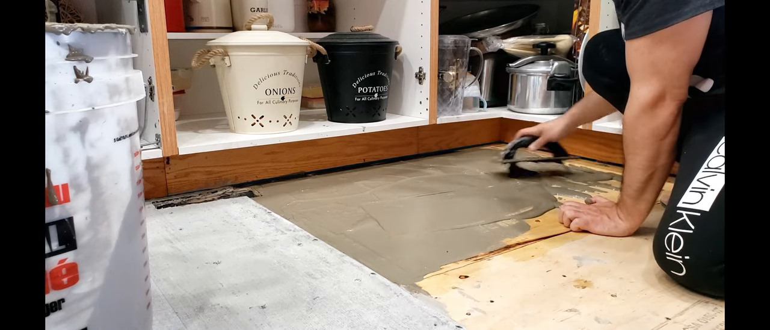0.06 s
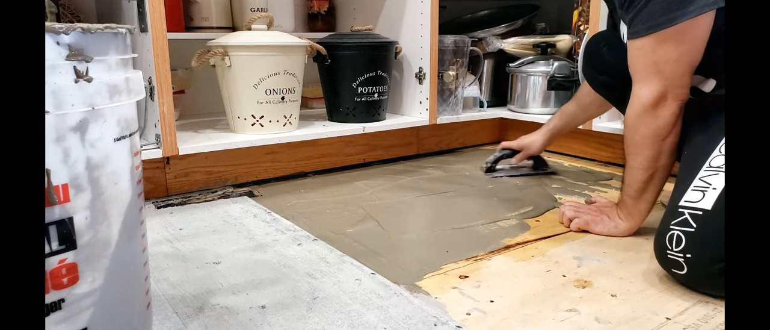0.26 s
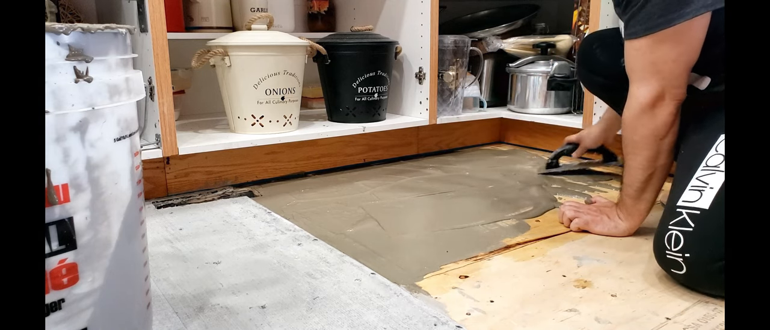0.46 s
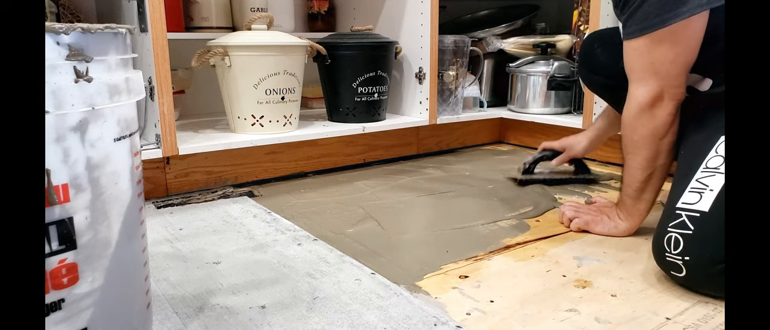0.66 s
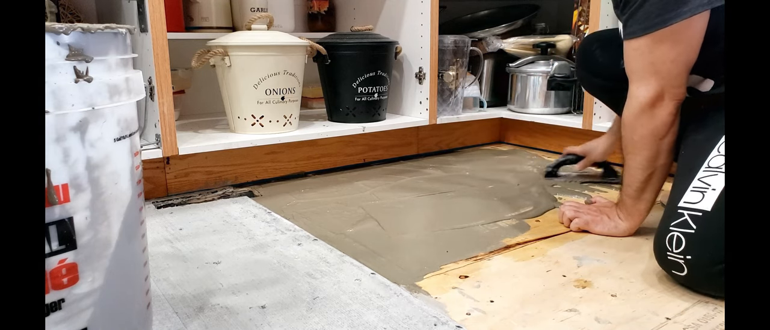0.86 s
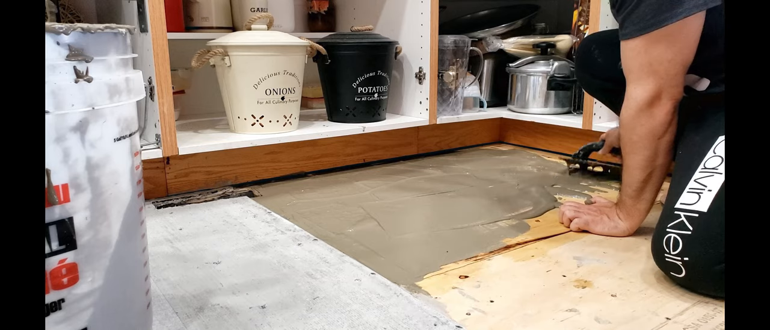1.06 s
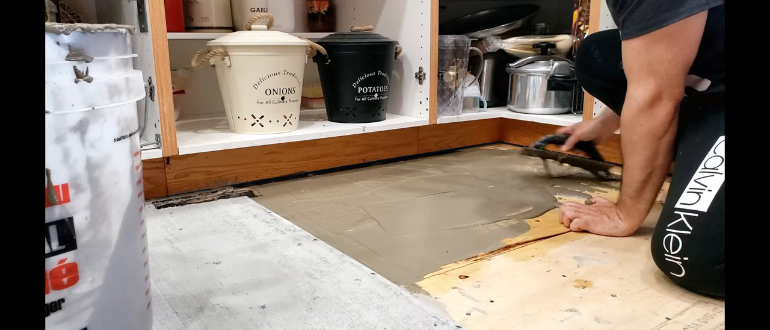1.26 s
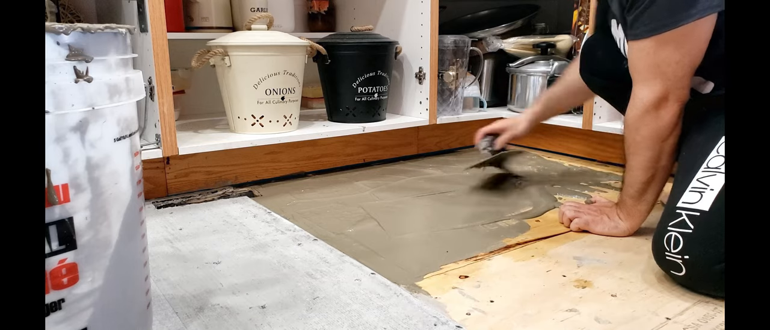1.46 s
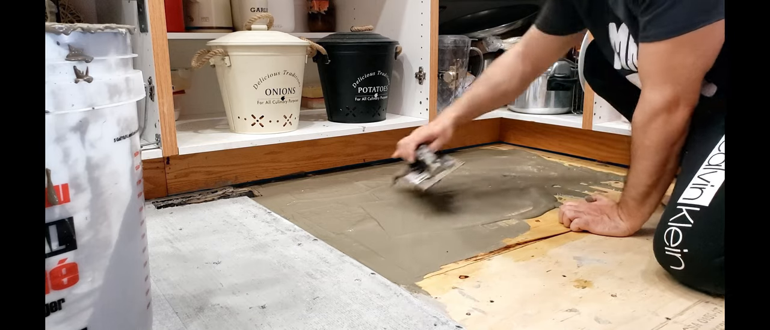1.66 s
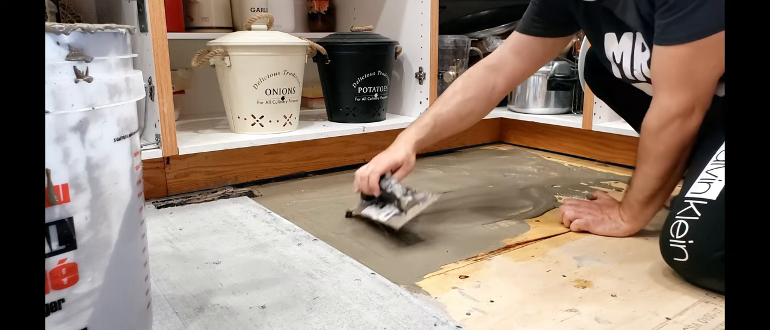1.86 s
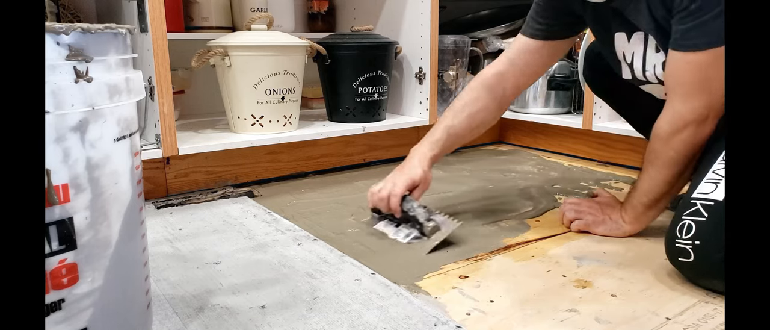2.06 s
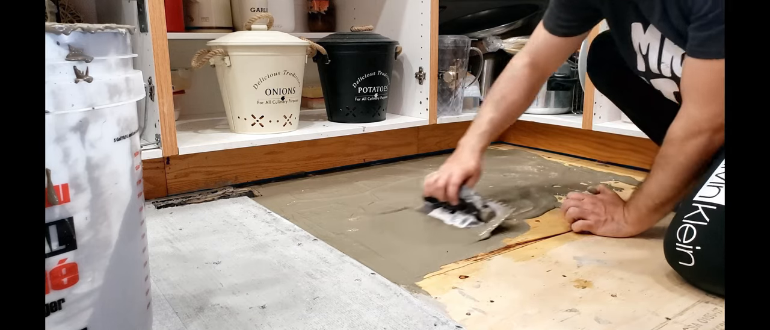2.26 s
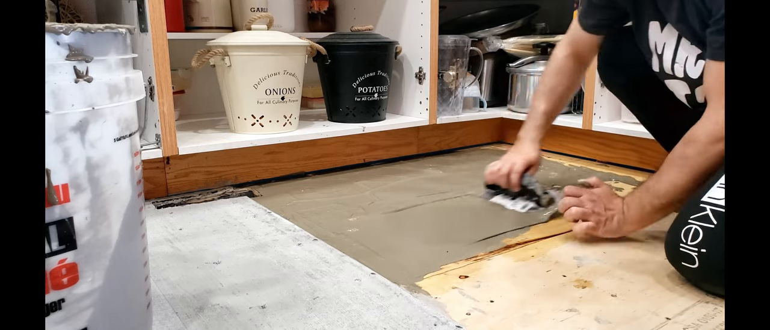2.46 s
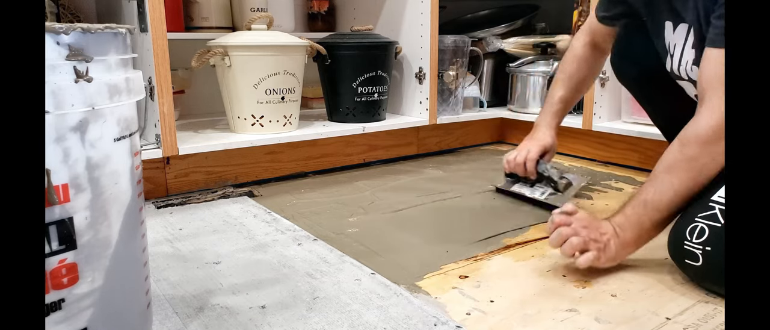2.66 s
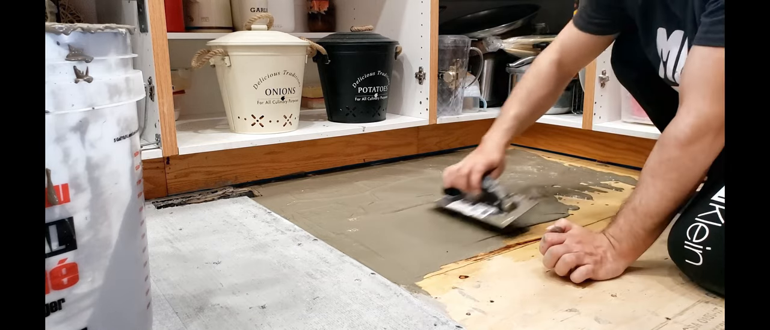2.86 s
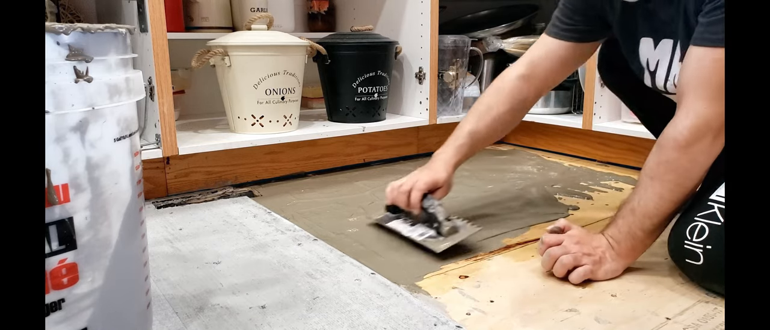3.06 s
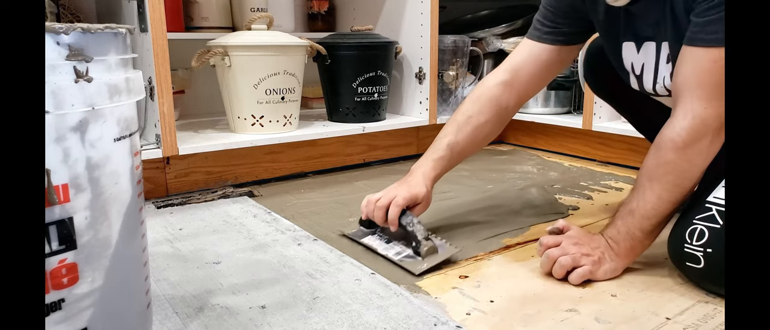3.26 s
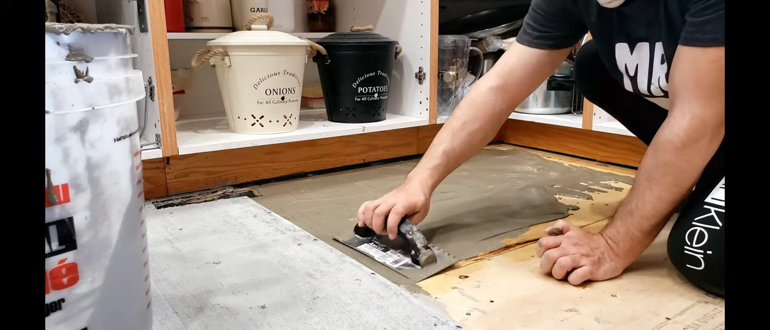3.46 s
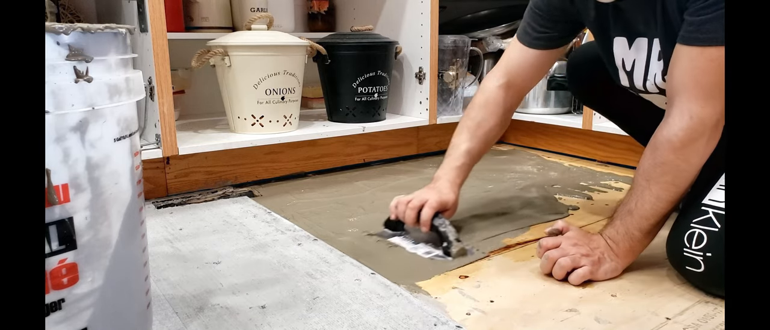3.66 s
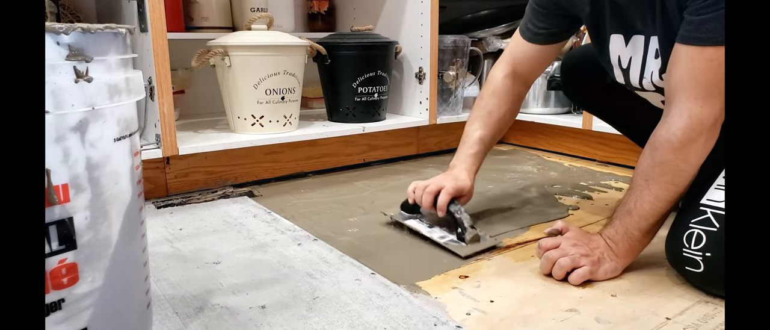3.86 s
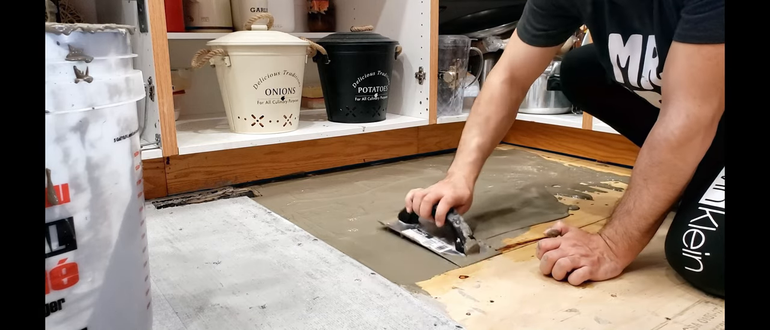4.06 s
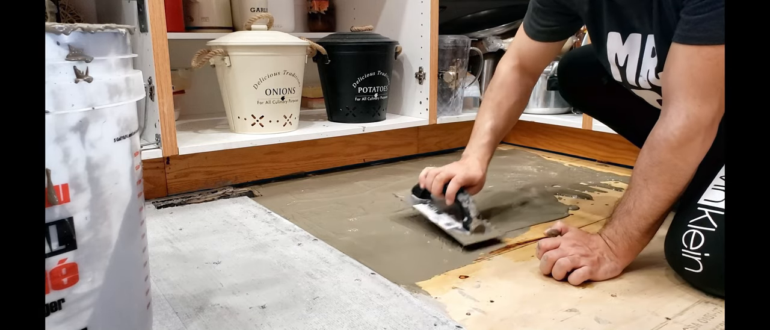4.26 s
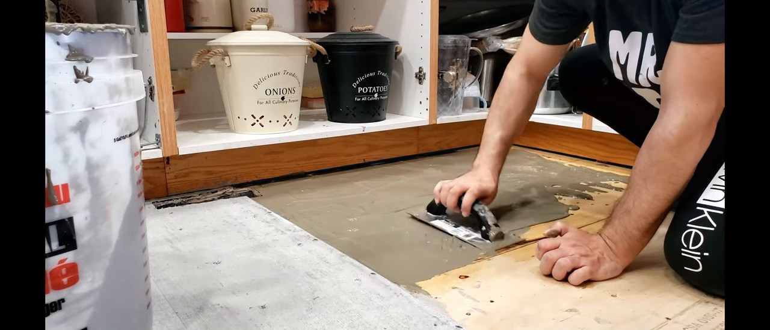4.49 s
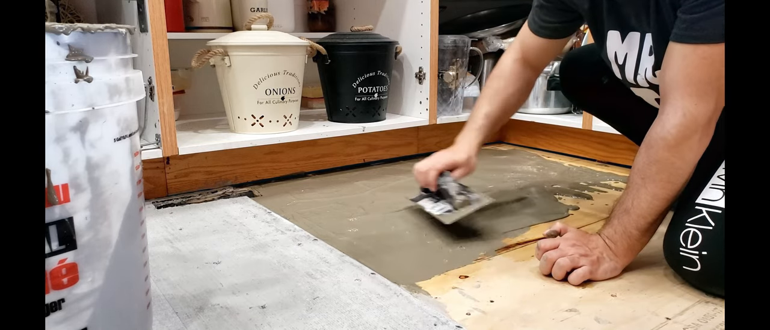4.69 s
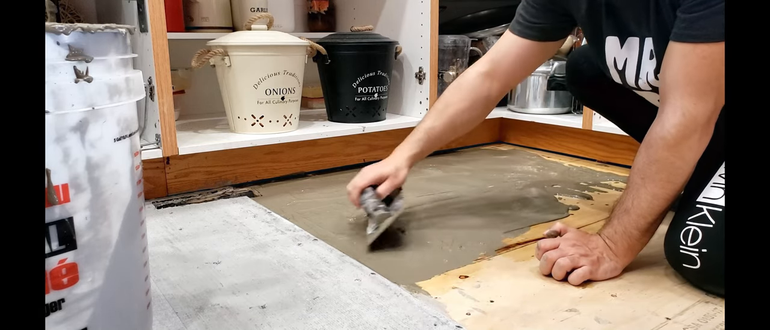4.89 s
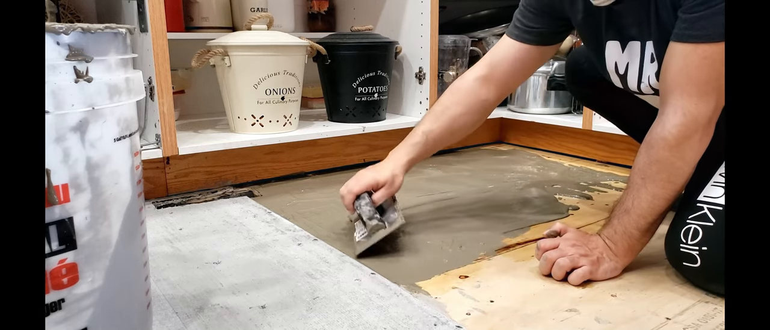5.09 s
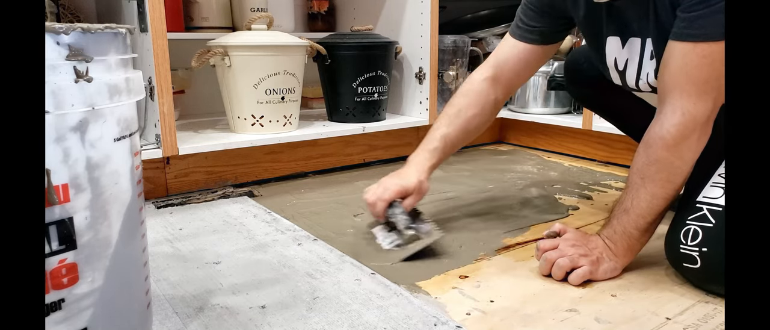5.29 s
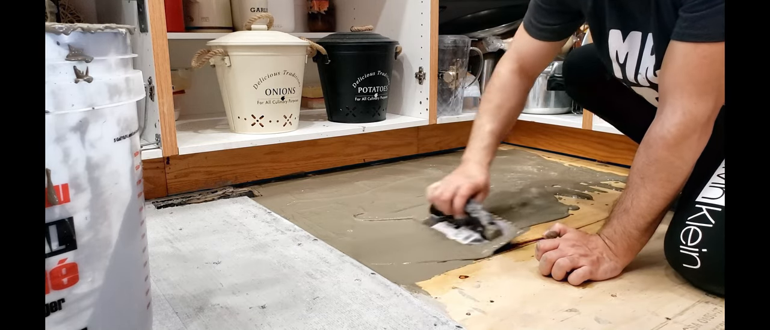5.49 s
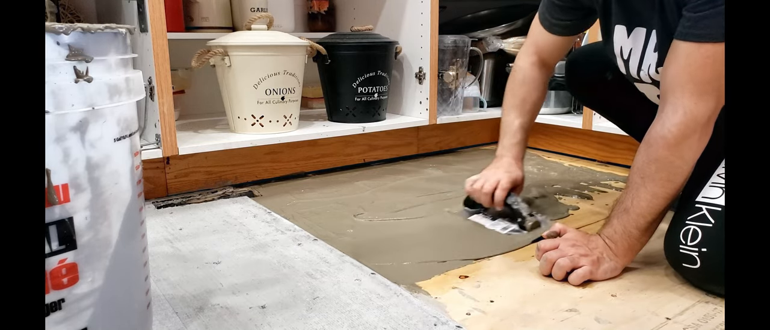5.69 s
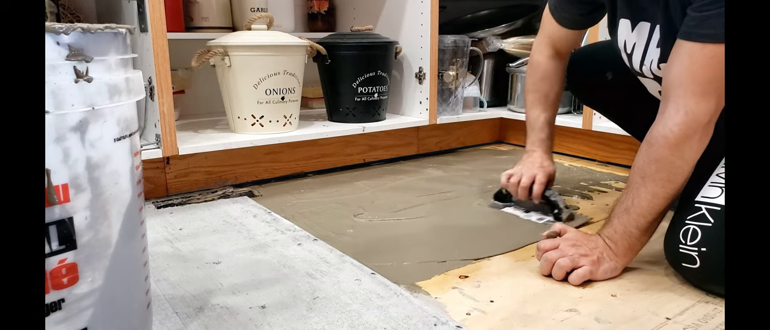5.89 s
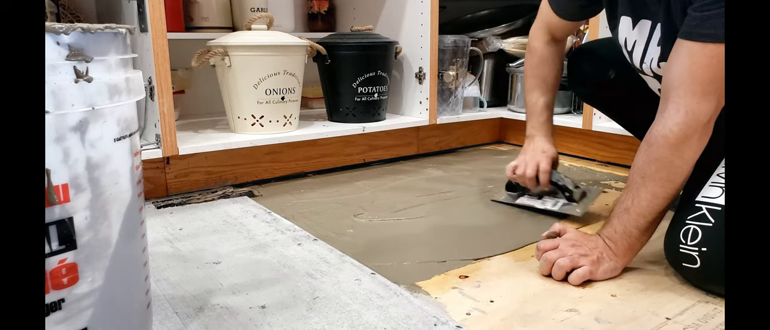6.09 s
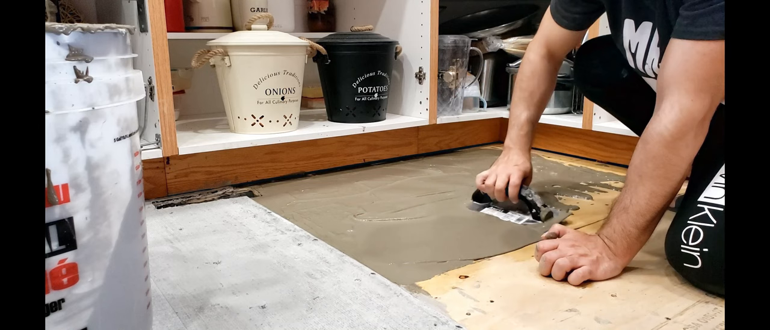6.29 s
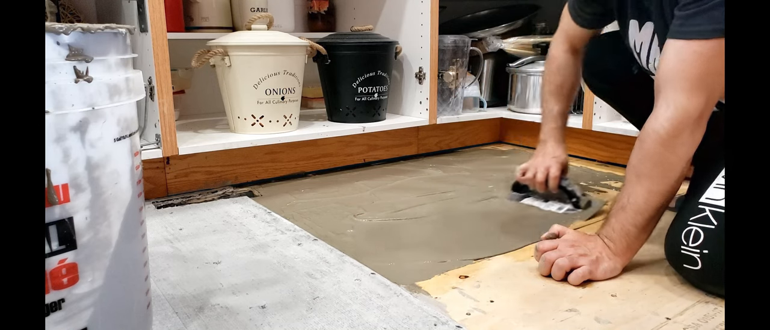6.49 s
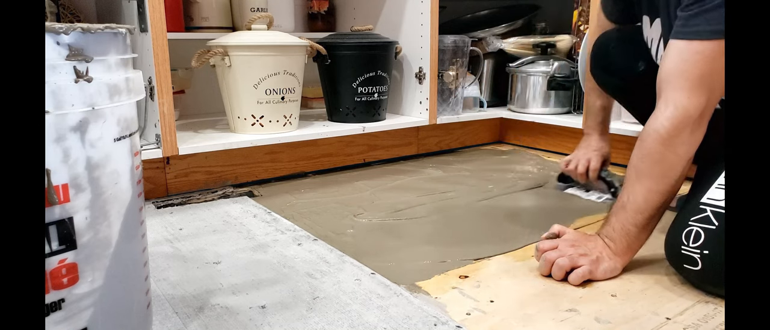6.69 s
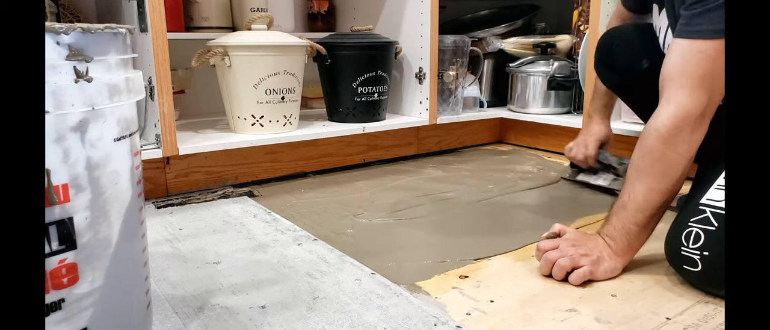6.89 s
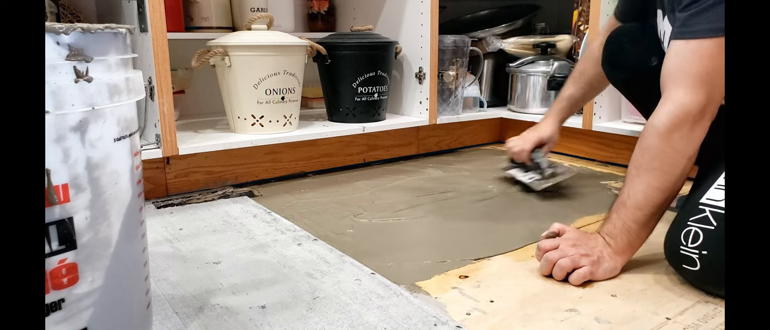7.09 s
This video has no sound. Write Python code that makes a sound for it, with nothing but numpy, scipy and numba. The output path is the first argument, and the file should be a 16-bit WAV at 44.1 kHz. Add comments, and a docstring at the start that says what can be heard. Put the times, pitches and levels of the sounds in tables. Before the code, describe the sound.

A steel trowel works thick mortar over a wooden subfloor, close by in a small room with a short echo. An appliance hums and hisses softly throughout. Each stroke is a sandy crackle with a blade rasp and a low shudder of boards.

A light tap at 0.4 seconds leads to a short scrape, then a wooden knock at 0.9 and another scrape. After a lull, the blade thumps down around 2.1 and drags until 2.7. A soft bump comes at 3.3, and scraping resumes from 3.5 to 4. The heaviest thumps fall at 4.2 and 4.6, each with a quick stroke. Between 3.9 and 4.7 the edge flicks over grit with thin steel rings, the last one brightest. Two dull bumps follow around 5. From 5.3 to 7 the strokes run almost together, with a faint ring at 6.1 and a knock at 6.4.

```python
"""A steel trowel spreads thick mortar over a wooden subfloor in a small room, in short strokes.
Each time the blade lands, the floor thumps. As it drags, sand crackles under the edge, the blade
rasps, and its sticking and slipping shakes the boards. Now and then the edge flicks over grit and
the steel rings. An appliance hums and hisses softly behind it all."""
import sys
import numpy as np
from scipy import signal
from scipy.fft import rfft, irfft, next_fast_len
from scipy.io import wavfile
from scipy.ndimage import uniform_filter1d
from numba import njit

SR = 44100
rng = np.random.default_rng(int(sys.argv[2]) if len(sys.argv) > 2 else 0)


def write(x):
    x = np.atleast_2d(x).T
    wavfile.write(sys.argv[1], SR, np.round(np.clip(x, -1, 1) * 32767).astype(np.int16))


N = 315046
TIME = np.arange(N) / SR
TOP_HZ = 16000

# The appliance's hum. Each row: pitch in Hz, level in dB.
HUM_TONES = [(59.2, -53), (118.4, -66.5), (355.3, -77.5), (500.6, -81)]
# The appliance's hiss and the room's rumble. Each row: frequency in Hz, relative level in dB.
AIR_COLOUR = [(25, -5), (58, -2), (100, -0.5), (160, -6.5), (220, -16), (400, -15), (700, -26.5),
              (950, -19), (1400, -31), (2100, -14), (3200, -40), (4400, -33.5), (5800, -31.5), (6200, -26),
              (6700, -31), (8500, -42), (15000, -35)]
# The blade lands or the floor is leant on. Each row: time in seconds, then the strength in dB of
# the floor's thump, the boards' knock, the blade's clack and the sand's tick.
LANDING_HITS = [(0.371, -45, -54, -55.5, -59), (0.418, -57, -75, -63, -75), (0.909, -36.5, -32, -46, -58),
                (2.117, -39.5, -55, -54.5, -61), (2.156, -29, -39, -47, -49.5),
                (3.251, -38.5, -70, -84, -93), (3.303, -47, -75, -80, -96), (3.539, -58, -54, -71, -58.5),
                (4.222, -23.5, -44.5, -43, -43), (4.599, -23, -47, -39.5, -51),
                (5.014, -28.5, -66, -66, -75), (5.133, -29, -54, -60, -65.5),
                (5.322, -38.5, -52, -61, -57.5), (6.44, -34, -41.5, -43.5, -58)]
# Ringing notes. Each row: pitch in Hz, seconds to fade by 60 dB, relative level in dB.
JOIST_NOTES = [(61.2, 0.27, 5.5), (78, 0.16, 8), (90.7, 0.42, 1), (129, 0.11, 2), (151.6, 0.3, 4),
               (183, 0.31, -2.5), (195.5, 0.12, -2.5)]  # the floor bouncing on the beams under it
BOARD_NOTES = [(144, 0.08, 8), (194.5, 0.41, 5), (230, 0.22, 5), (305.9, 0.25, 7), (347, 0.28, -18),
               (403.3, 0.47, -4.5), (457, 0.57, -6), (568, 0.56, -9.5), (632, 0.21, -16), (724, 0.26, -6.5)]  # the floorboards
DAMPED_BLADE_NOTES = [(922, 0.31, 16), (1340, 0.032, -43), (1400, 0.083, 9), (1670, 0.53, -2.5),
                      (1610, 0.038, -9), (1900, 0.03, 39.5), (2040, .08, -31), (2150, 0.24, -28),
                      (2410, 0.054, 2), (2650, 0.063, -35.5)]  # the blade in mortar
FREE_BLADE_NOTES = [(1940, 0.34, -4), (3970, 0.67, -13), (4300, 0.38, -29), (4274, .25, -3),
                    (5330, 0.25, -7), (6400, 0.18, 3)]  # the blade ringing freely
# The broad tone of boards, blade and sand. Each row: frequency in Hz, relative level in dB.
BOARD_TONE = [(50, -10.5), (100, -14), (180, 2), (320, 2.5), (650, 7), (850, -3.5), (1300, -4.5),
              (3000, -47)]
BLADE_TONE = [(300, -26.5), (600, -19.5), (850, 2.5), (1100, -7), (1500, -0.5), (2400, -4.5), (3200, -14.5),
              (5000, -12), (10000, -66.5)]
SAND_TONE = [(800, -46), (2000, -1), (3200, 0.5), (4300, 4), (5300, 2), (6200, 2), (7000, 1), (8000, -7),
             (9500, -7), (12500, -2), (16000, -10.5)]
# The trowel's pushes. Each row: start, length and fade-in in seconds, drive on the sand in dB, its
# swell over the push in dB, extra drive on the blade and on the boards in dB, mortar heaped up from
# 0 to 1, pitch of the chatter and of the blade's flexing in Hz, starting place in metres.
PUSHES = [ (0.514, 0.1, 0.024, -38.5, 5.5, 2.5, 0, 0.82, 273, 1340, 0.59),
          (0.92, 0.18, 0.011, -76, 12, -7, 19, 0, 417, 1410, .8),
          (1.051, 0.077, 0.028, -39, 1, -2.5, 3, 0.64, 377, 1700, 0.89),
          (2.157, 0.13, 0.0035, -48.5, -7.5, 6, 8, 0.1, 194, 1440, 0.033),
          (2.313, 0.21, 0.04, -42.5, 8, 5, 6, 0, 560, 1010, 0.14),
          (2.535, 0.18, 0.063, -40, -6.5, 4, 7.5, 0.7, 400, 1220, 0.44),
          (3.538, 0.12, 0.0023, -57.5, -7, 0, -2, 0, 168, 1510, 0.036),
          (3.625, 0.21, 0.13, -42, 2, -4, -2.5, 0.02, 284, 1450, 0.066),
          (3.859, 0.087, 0.061, -34, -10, -9.5, -8, 0.53, 245, 1590, 0.34),
          (4.222, 0.13, 0.0031, -40, 9, 1.5, -2.5, 0.23, 191, 1680, 0.12),
          (4.601, 0.089, 0.013, -37.5, -1, 1, -2, 0.1, 187, 1840, 0.32),
          (4.996, .035, 0.009, -60, -4.5, 12, 11.5, 0, 149, 1400, 0.11),
          (5.136, 0.041, 0.012, -55, -11, 13, 13.5, 0.35, 146, 1180, 0.12),
          (5.314, 0.23, 0.089, -43, 5, 6, 3, 0.24, 192, 1470, 0.058),
          (5.597, .24, 0.041, -42, -9, 2.5, 5, 0, 380, 1540, .3),
          (5.842, 0.266, 0.034, -41.5, -1.5, -4, 0, 0, 278, 1830, 0.437),
          (6.106, 0.071, 0.058, -44.5, -5, 12, 1, 1, 404, 1490, 0.73),
          (6.288, 0.024, .012, -57, 7, 0, 3, 0, 192, 1400, 0.48),
          (6.452, 0.25, 0.16, -35, 1.5, 3, -1, 0.47, 490, 1660, 0.67),
          (6.727, 0.21, 0.011, -35.5, 4.5, -1.5, 1.5, 1, 270, 1340, 0.73), ]
# The edge flicks over grit. Each row: time in seconds, strength of the scrape and of the ring in dB.
GRIT_FLICKS = [(3.923, -38, -58), (4.308, -40, -62), (4.379, -35.5, -52), (4.714, -29.5, -42),
               (6.075, -39, -60)]
# How long the room rings. Each row: frequency in Hz, seconds to fade by 60 dB.
ROOM_DECAY = [(100, 0.83), (400, 0.26), (1800, 0.35), (5000, 0.31), (13000, 0.25)]
# Sound that arrives by the walls. Each row: frequency in Hz, level in dB against the direct sound.
ECHO_LEVEL = [(60, -18.5), (250, -15), (600, 5), (1300, 1), (5000, 4), (14000, 6)]
# The trowel's stereo balance. Each row: frequency in Hz, left minus right in dB.
LEFT_MINUS_RIGHT = [(100, 3), (250, -0.2), (1200, 4.5), (2400, 2.4), (5500, 1.2), (8000, -2), (11000, -3.5),
                    (15000, -6)]


def amp(db):
    """Turn decibels into a gain."""
    return 10 ** (np.asarray(db) / 20)


def unit(x):
    """Scale a signal to an average (rms) level of 1."""
    return x / np.sqrt(np.mean(x ** 2))


def at(table, hz):
    """Read between a table's (Hz, value) rows, on a scale of octaves."""
    points, values = np.transpose(table)
    return np.interp(np.log(np.maximum(hz, 1)), np.log(points), values)


def tint(x, table):
    """Shape a sound's tone with a (Hz, dB) table."""
    size = next_fast_len(x.shape[-1])
    gain = amp(at(table, np.fft.rfftfreq(size, 1 / SR)))
    return irfft(rfft(x, size) * gain, size)[..., :x.shape[-1]]


def through(x, response):
    """Pass a sound through an object, given its response to one tap."""
    return signal.oaconvolve(np.float32(x), np.float32(response))[:N]


def broad(table, size=4096):
    """A short tap response with the tone of a (Hz, dB) table; energy 1."""
    cepstrum = irfft(np.log(amp(at(table, np.fft.rfftfreq(size, 1 / SR)))))
    cepstrum[1:size // 2] *= 2  # fold it so that nothing sounds before the tap
    cepstrum[size // 2 + 1:] = 0
    response = irfft(np.exp(rfft(cepstrum)))
    return response / np.linalg.norm(response)


def ring(notes):
    """A tap response made of fading notes; energy 1."""
    t = TIME[:SR // 2]
    response = sum(amp(db - 60 * t / fade_s) * np.cos(2 * np.pi * hz * t) for hz, fade_s, db in notes)
    cutoff_hz = min(1.5 * notes[-1][0], TOP_HZ)  # wood and steel give off little above their top note
    response = signal.sosfilt(signal.butter(2, cutoff_hz, fs=SR, output="sos"), response)
    return response / np.linalg.norm(response)


def walk(rate):
    """Glide to a new random value rate times a second; rms 1."""
    hold = max(int(SR / rate), 1)
    steps = np.repeat(rng.standard_normal(N // hold + 1), hold)
    return unit(uniform_filter1d(steps, hold)[:N])


def grains(rate, spread_db):
    """About rate tiny random impacts a second, uneven in size; rms 1."""
    chance, luck, direction = rng.random((3, N), dtype=np.float32)
    happens, impacts = chance < rate / SR, np.zeros(N)
    rarity = np.minimum(-np.log1p(-luck[happens]), 5)
    impacts[happens] = amp(spread_db * rarity) * np.sign(direction[happens] - .5)
    return unit(impacts)


def fading(times, levels_db, decay_s, rise_s=1e-9):
    """A loudness curve that jumps up at each time and dies away."""
    t = TIME[:SR // 3]
    shape = np.exp(-t / decay_s) * np.minimum(t / rise_s, 1)
    envelope = np.zeros(N + SR)
    for start, db in zip(times, levels_db):
        envelope[int(start * SR):int(start * SR) + len(shape)] += amp(db) * shape
    return envelope[:N]


def appliance(air_db=-61, wide_hz=900):
    """A motor hums over a soft hiss, both wavering a little; the bass is alike on both sides."""
    hum = sum(amp(db) * np.sqrt(2) * np.sin(2 * np.pi * (hz * TIME + rng.random()))
              for hz, db in HUM_TONES)
    side_colour = [(hz, db + 20 * np.log10(min(hz / wide_hz, 1))) for hz, db in AIR_COLOUR]
    mid = tint(rng.standard_normal(N), AIR_COLOUR)
    side = tint(rng.standard_normal(N), side_colour)
    air = np.array([mid + side, mid - side]) / np.std(mid)
    return hum * amp(0.19 * walk(14)) + air * amp(air_db + .5 * walk(19))


def landings(push_s=0.0014, cushion_s=0.003):
    """Mortar cushions each landing: a soft push on the floor, a shudder and a short splat of grains."""
    times, thump_db, knock_db, clack_db, tick_db = np.transpose(LANDING_HITS)
    splat = grains(rate=3800, spread_db=-7.5)
    push = fading(times, thump_db, push_s) - fading(times, thump_db, push_s / 2)  # swells, then lets go
    shudder = splat * fading(times, thump_db, decay_s=0.039)
    # the blade sinks into the mortar before it knocks
    knock = splat * fading(times, knock_db, decay_s=0.018, rise_s=cushion_s)
    clack = splat * fading(times, clack_db, decay_s=0.013, rise_s=cushion_s)
    tick = splat * fading(times, tick_db, decay_s=0.0037)
    thump = through(amp(-2) * push + amp(-9) * shudder, ring(JOIST_NOTES))
    boards = amp(-0.5) * through(knock, ring(BOARD_NOTES)) + through(knock, broad(BOARD_TONE))
    blade = amp(11.5) * through(clack, broad(BLADE_TONE))
    blade += amp(-18.5) * through(clack, ring(DAMPED_BLADE_NOTES))
    return thump + boards + blade + amp(19) * through(tick, broad(SAND_TONE))


def pressure(heap_share=0.23):
    """Three drives and two pitches over time: each push bites, heaps up mortar and lets go."""
    release_s = np.array([0.018, 0.026, 0.025])  # sand, blade and boards fall quiet after a push
    heap_db = (-10.5, -4.5, 7)  # a full ridge muffles sand and blade and drags harder on the boards
    sink_octaves = (-0.047, -0.18)  # chatter and flexing drop in pitch as the blade flattens
    drive, pitch = np.zeros((3, N)), np.zeros((2, N))
    for start, length, attack, sand_db, swell_db, blade_db, board_db, heaped, *pitches_hz, _ in PUSHES:
        span = slice(int(start * SR), int((start + length) * SR) + SR // 4)
        t = TIME[span] - start
        progress = np.minimum(t / length, 1)
        heap = heaped * np.exp((progress - 1) / heap_share)  # the ridge gathers late in the push
        release = np.exp(-np.outer(1 / release_s, np.maximum(t - length, 0)))
        contact = np.clip(t / attack, 0, 1) * release
        level_db = sand_db + swell_db * (progress - .5) + np.outer(heap_db, heap)
        drive[:, span] += contact * amp(level_db + np.array([[0], [blade_db], [board_db]]))
        pitch[:, span] = np.array(pitches_hz)[:, None] * 2 ** np.outer(sink_octaves, progress - .5)
    pitch = np.where(pitch > 0, pitch, pitch.max(axis=1, keepdims=True))  # fill the gaps between pushes
    return *drive, *pitch


@njit
def resonance(x, hz, damping):
    """Let through a band around a moving pitch; more damping makes it wider."""
    y, band, low = np.empty(len(x)), 0., 0.
    for i in range(len(x)):
        g = np.tan(np.pi * hz[i] / SR)
        y[i] = (band + g * (x[i] - low)) / (1 + g * (g + damping))
        band, low = 2 * y[i] - band, low + 2 * g * y[i]
    return y


def chatter(x, hz, damping):
    """Turn impacts into a rough note that stays evenly loud as its pitch moves; rms 1."""
    hz = np.clip(hz, 60, 8000)
    return unit(resonance(resonance(x, hz, damping), hz, damping) / np.sqrt(hz))


def scraping():
    """Sand crushed under the edge hisses; coarser catches shake the blade, boards and beams."""
    sand_drive, blade_drive, board_drive, chatter_hz, flex_hz = pressure()
    judder = unit(amp(2.18 * walk(70) + 2.15 * walk(350)))  # the edge sticks and slips unevenly
    sand = grains(rate=8000, spread_db=2.5) * judder * sand_drive
    catches = grains(rate=2500, spread_db=3) * judder * blade_drive
    slips = grains(rate=900, spread_db=2) * judder * board_drive
    hiss = amp(5.5) * through(sand, broad(SAND_TONE))
    rasp = amp(-3) * through(catches, broad(BLADE_TONE))
    rasp += amp(-17) * through(catches, ring(DAMPED_BLADE_NOTES))
    flex_taps = grains(rate=2300, spread_db=3.5)
    bending_hz = flex_hz * np.exp(0.14 * walk(30))  # the blade's note shifts with the line of contact
    flex = amp(-6) * blade_drive * chatter(flex_taps, bending_hz, damping=0.41)
    rumble = amp(-5) * through(slips, broad(BOARD_TONE)) + amp(-13.5) * through(slips, ring(BOARD_NOTES))
    groan = amp(-7) * board_drive * chatter(grains(rate=900, spread_db=5), chatter_hz, damping=0.8)
    sway = amp(-14) * through(slips, ring(JOIST_NOTES))
    return hiss + rasp + flex + rumble + groan + sway


def flicks(half_length_s=0.022):
    """The edge flicks over grit: a bright swell that sets the blade ringing."""
    grit = grains(rate=7000, spread_db=3)
    scrape, strike = np.zeros((2, N))
    for peak_s, scrape_db, ring_db in GRIT_FLICKS:
        swell = grit * np.maximum(1 - ((TIME - peak_s) / half_length_s) ** 2, 0) ** 2
        scrape += amp(scrape_db) * swell
        strike += amp(ring_db) * swell
    return through(scrape, broad(SAND_TONE)) + through(strike, ring(FREE_BLADE_NOTES))


def travel(metres_per_s=0.66):
    """The trowel's place in metres: it moves steadily in a push, then is carried to the next."""
    path = [(start + t, place + metres_per_s * t)
            for start, length, *_, place in PUSHES for t in (0, length)]
    return np.interp(TIME, *np.transpose(sorted(path)))


def echoes(count, build_s=0.00011, left_lag_s=0.00013):
    """Stereo tap responses of count spots: direct sound, then a short tail from cabinets and walls."""
    t = TIME[:2 ** 15]
    hz = np.fft.rfftfreq(len(t), 1 / SR)
    octave = np.log2(np.clip(hz, 62.5, 16000) / 62.5)
    noise = rfft(rng.standard_normal((count, 2, len(t)), dtype=np.float32))
    tail = 0
    for k in range(9):  # each octave fades at its own speed
        decay = amp(-60 * t / at(ROOM_DECAY, 62.5 * 2 ** k)) * (1 - np.exp(-t / build_s))
        band = irfft(noise * np.float32(np.maximum(1 - abs(octave - k), 0)))
        tail = tail + band * np.float32(decay / np.linalg.norm(decay))
    direct = np.exp(-2j * np.pi * np.outer([left_lag_s, 0], hz))
    echo_gain = amp(at(ECHO_LEVEL, hz))
    balance = amp(np.outer([.5, -.5], at(LEFT_MINUS_RIGHT, hz)))
    responses = irfft(balance * (direct + echo_gain * rfft(tail)) / np.sqrt(1 + echo_gain ** 2))
    return np.roll(responses, SR // 1000, axis=-1)[..., :SR // 2]


def room(x, spots=14):
    """Each spot on the floor has its own echo pattern; the trowel glides from one to the next."""
    spot = np.clip(travel(), 0, 1) * (spots - 1)
    heard = np.zeros((2, N))
    for k, pair in enumerate(echoes(spots)):
        near = x * np.maximum(1 - abs(spot - k), 0)
        heard += [through(near, response) for response in pair]
    return amp(-0.58) * heard


def scene():
    """Trowel and floor in the room, over the appliance."""
    return room(scraping() + landings() + flicks()) + appliance()


def record(dry, low_cut_hz=46):
    """The deepest bass and the highest treble are cut away."""
    lean = signal.sosfilt(signal.butter(4, low_cut_hz, "highpass", fs=SR, output="sos"), dry)
    return signal.sosfilt(signal.ellip(10, .2, 70, TOP_HZ, fs=SR, output="sos"), lean)


dry = scene()
out = record(dry)
write(out)
```